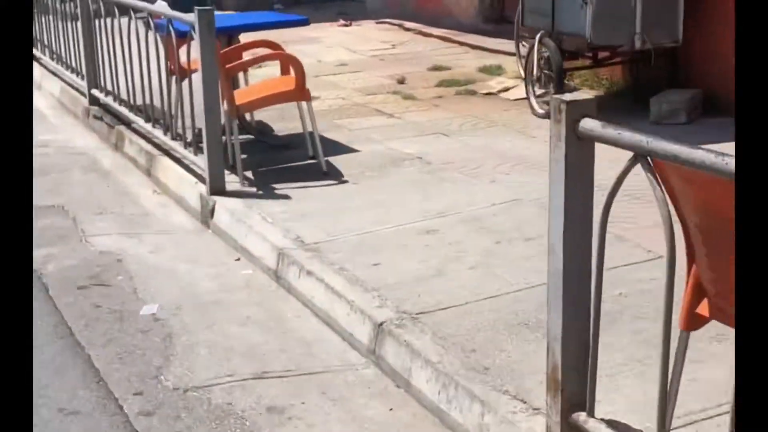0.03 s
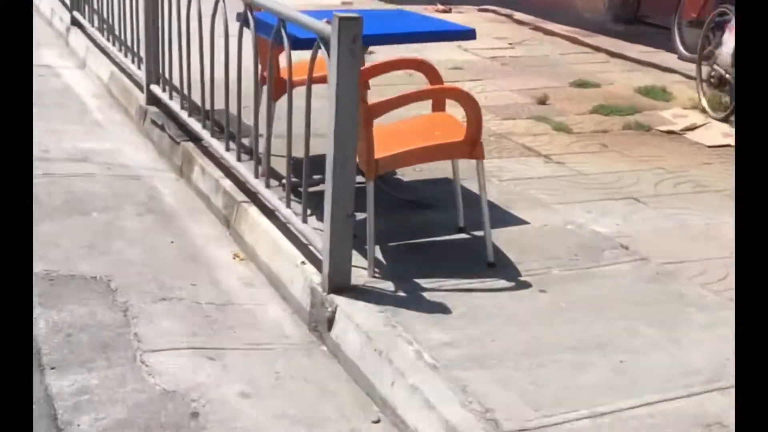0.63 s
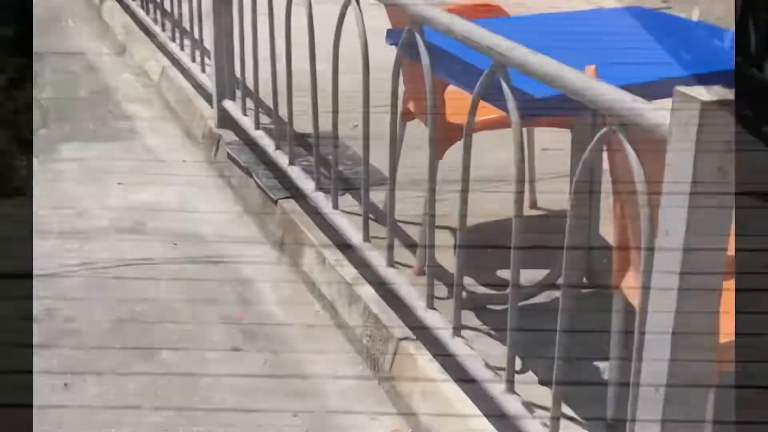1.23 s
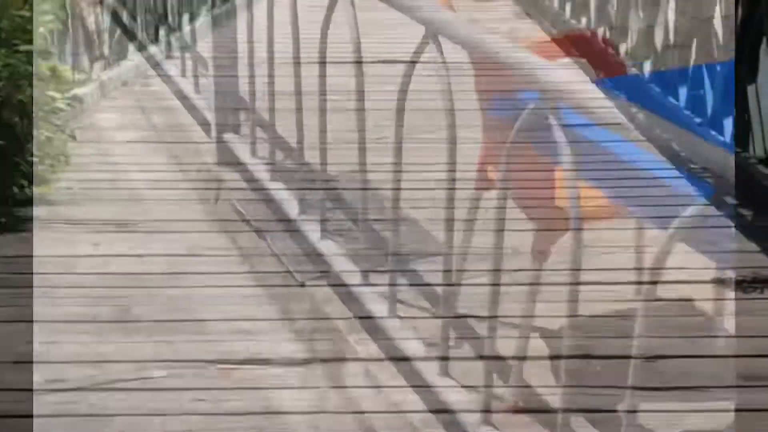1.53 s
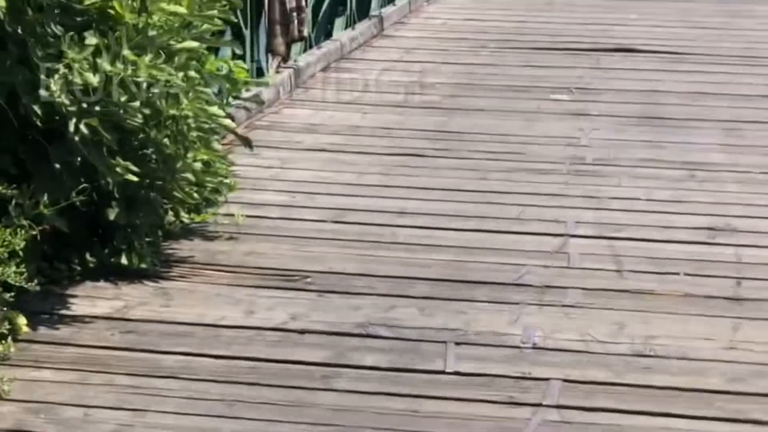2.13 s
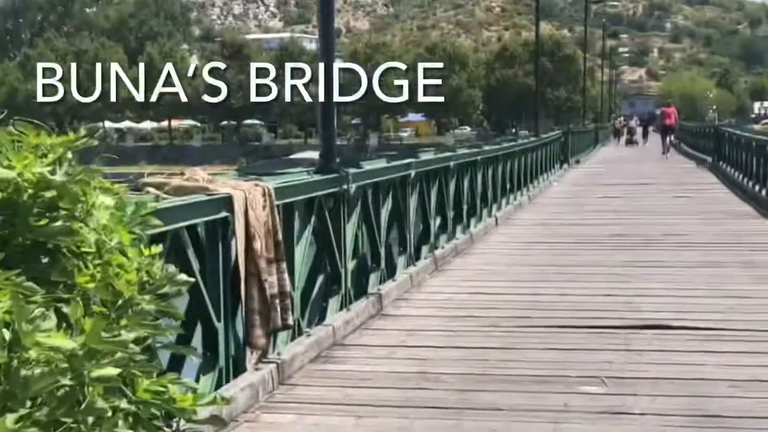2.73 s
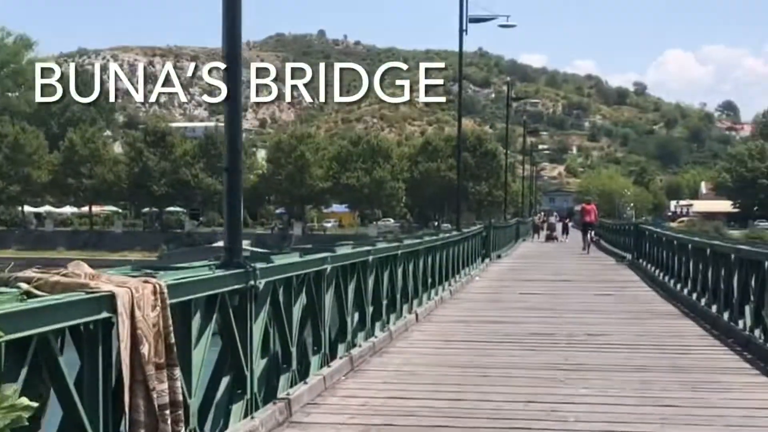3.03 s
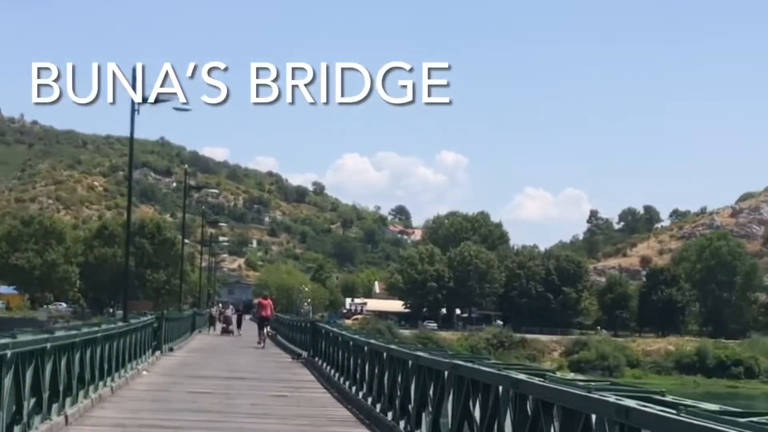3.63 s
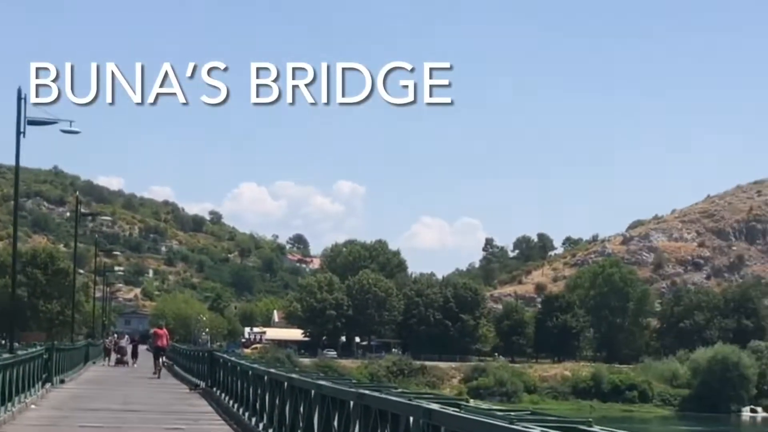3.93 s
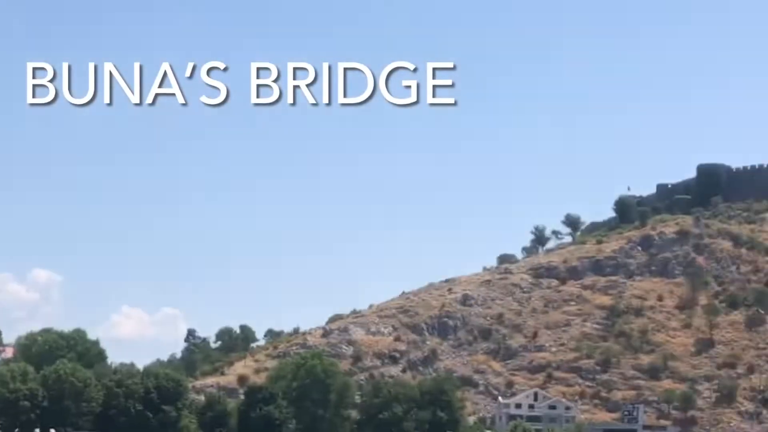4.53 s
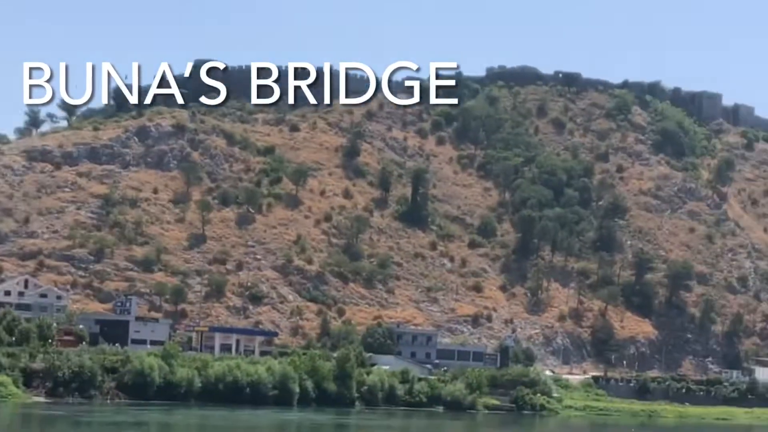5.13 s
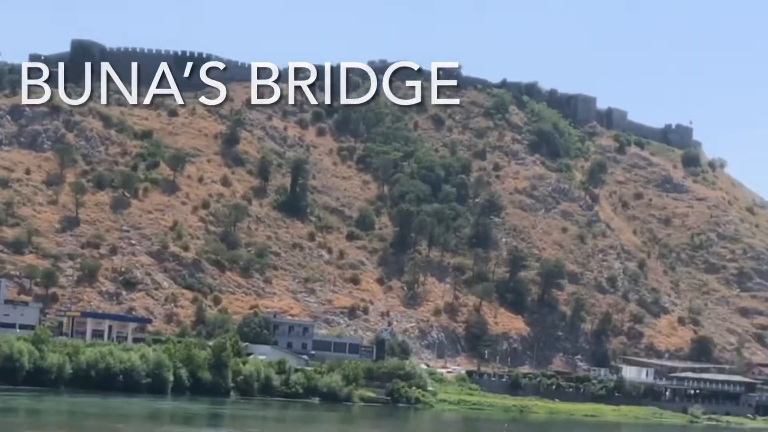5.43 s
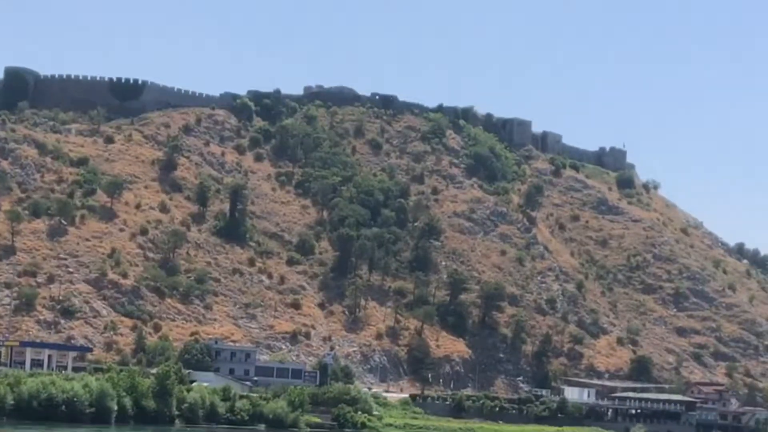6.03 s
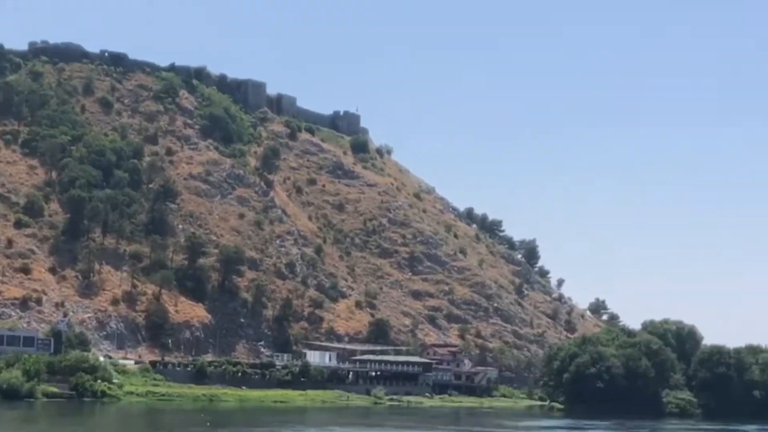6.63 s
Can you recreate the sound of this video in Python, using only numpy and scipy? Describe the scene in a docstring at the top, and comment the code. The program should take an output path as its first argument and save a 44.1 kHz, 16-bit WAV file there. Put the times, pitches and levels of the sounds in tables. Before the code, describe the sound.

A bicycle rolls along a street with a soft tyre roar, a distant idling engine and low puffs of wind on the microphone. This soon fades into a wooden bridge, heard from the saddle. The wheels rumble and loose planks knock irregularly, in clusters that grow louder. Jolts thud in the microphone, while the fittings rattle, tick and squeak faintly over a light hiss of tread and open air.

```python
"""Loose planks of a wooden bridge knock under a bicycle, front wheel then rear, heard from the saddle.
The wheels rumble over the deck, jolts thud in the microphone, and the bicycle's fittings rattle, tick and
squeak faintly over the hiss of tread and open air. The ride starts on a street with tyre roar, an idling
engine and puffs of wind, which fades out as the bridge fades in, between about 1 and 2 s."""
import sys
import numpy as np
from scipy import signal
from scipy.fft import rfft, irfft, next_fast_len
from scipy.io import wavfile
from scipy.ndimage import uniform_filter1d

SR = 44100
rng = np.random.default_rng(int(sys.argv[2]) if len(sys.argv) > 2 else 0)


def digitize_waveform(pressure):
    """Quantize a signal to 16-bit integers and store it at the path in sys.argv[1].

    Rows of a 2-D input are taken as channels; values are limited to [-1, 1].
    """
    field = np.atleast_2d(pressure).T
    bounded = np.clip(field, -1, 1)
    quanta = np.round(bounded * 32767).astype(np.int16)
    wavfile.write(sys.argv[1], SR, quanta)


N = 299439
T = np.arange(N) / SR
STREET_FADE_S = (1.145, 1.826)

# modes of a plank on its beams: f/Hz, level/dB, t60/s
PLANK_MODES = [(96, -1.5, 0.2), (126.7, 3, 0.11), (160, 0.5, 0.15), (198.5, -1, 0.21), (242, 0.5, 0.18),
               (291, -1.5, 0.079), (335, -2.5, 0.09), (390, -8, 0.18), (464, 2.5, 0.048), (525.4, 2, 0.13),
               (618, -4, 0.17), (687.5, -4, 0.19), (784, -0.5, 0.12), (950, 0.5, 0.043), (1025, -5.5, 0.11),
               (1152, -6.5, 0.12), (1320, -11.5, 0.08), (1620, -15.5, 0.1), (2060, -11.5, 0.1),
               (2630, -26, 0.036)]
# spectrum of the shuddering deck: f/Hz, level/dB
DECK_SPECTRUM = [(21, -19), (35, -1.5), (140, 2), (178, -6), (316, -1), (393, -3.5), (452, -1.5),
                 (772, -9.5), (852, -13), (1150, -15.5), (1770, -28), (2800, -35), (4000, -55), (5200, -76),
                 (8800, -120)]


def knocks(tight_slap_db=14, shudder_db=-11.5, bounce_gain=0.61, bounce_s=0.011, press_s=0.0043):
    """A plank slaps its beam, rings and bounces twice; the deck around it shudders on."""
    out, t = np.zeros(N), np.arange(SR // 3) / SR
    for s, db, thump_db, clap_db, ring in blows():
        # tight plank (small ring): more slap, less bounce, thinner blow
        board = crest(struck_part(PLANK_MODES, t, ring, size_spread=0.041, spot_db=4))
        board += undb(tight_slap_db * (1 - ring)) * crest(slap(t, ring))
        board *= 1 - decay(t, press_s * ring)  # soft tyre presses down
        hit = board.copy()
        lags = np.cumsum(bounce_s * SR * (0.5 + rng.random(2))).astype(int) + 1
        for k, lag in enumerate(lags, 1):
            hit[lag:] += (bounce_gain * ring) ** k * board[:-lag]
        shudder = shaped_noise(DECK_SPECTRUM, len(t)) * decay(t, 0.55 * ring) * (1 - decay(t, 0.018))
        hit = crest(hit) + undb(shudder_db) * ring * shudder
        # a heavy blow bends the whole board, a hard one claps
        thump = undb(thump_db - 1) * crest(band(hit, 72, 199))
        knock = crest(band(hit, 189, 636))
        clap = undb(clap_db) * crest(band(hit, 740, 2000))
        add(out, s, undb(db) * min(ring, 1) ** 0.78 * (knock - thump - clap))
    return out


def blows(wheelbase_m=1.08, cruise_m_s=2.781, gentle_db=-36, thump_per_db=-0.27, thump_db_per_m_s=-42):
    """Both wheels strike each plank. Rows: t/s, level/dB, thump/dB, clap/dB, t60 factor."""
    # front wheel on loose planks: t/s, level/dB, clap/dB, t60 factor, rear wheel re front/dB
    loose_planks = [(1.524, -33.5, -5, .3, -19), (1.886, -49.5, -8, 1, -24), (1.96, -48, -8, .7, -6),
                    (2.082, -41, -8.5, .6, -11), (2.175, -56, 5, .5, -15), (2.31, -55.5, -7, .7, 11),
                    (2.337, -37, -27, 1.2, -11.5), (2.405, -44.5, -11, 1, -23), (2.447, -45.5, -4, .7, -18),
                    (2.507, -41.5, -6.5, .7, -15), (2.601, -42, -12.5, 1, 4.5), (2.664, -46, -18, .6, -17),
                    (2.921, -44, -9.5, 1, -7), (3.188, -43.5, 0, 1, -8), (3.257, -37, -9, .55, -17),
                    (3.366, -44.5, 3, .55, 3.5), (3.473, -36, -14, 1, -38), (3.489, -37.5, -1, .8, -7.5),
                    (3.512, -35, -11, .9, -32), (3.533, -30, -2.5, .6, -39), (3.565, -37.5, -15, .7, -24),
                    (3.595, -37.5, -4.5, .6, -27), (3.822, -40.5, -3, .7, -33),
                    (3.987, -28.5, -4.5, .5, 1.5), (4.001, -36, -16, .8, 4.5), (4.016, -26, -1.5, .7, -2),
                    (4.029, -24.5, -10.5, .85, 0.5), (4.054, -35.5, -6, .8, -8),
                    (4.223, -28.5, -5.5, .3, -5), (4.26, -41.5, 3.5, .7, -22), (4.587, -42.5, 7, .3, -27),
                    (4.756, -45.5, 2.5, 1, -24), (4.826, -33.5, -15.5, .9, 0.5), (4.858, -52, -3, 1.2, 2),
                    (5.395, -40.5, 1, .45, -27), (5.479, -38.5, -23, 1, -12), (5.58, -34, -12, .8, 1),
                    (5.731, -35.5, -40, .8, 2), (5.851, -30, -6.5, .9, -6.5), (6.003, -28, -17, .9, 0),
                    (6.051, -33, -17, 1.1, -13), (6.108, -27, -11, .8, 0), (6.133, -25, -7.5, .6, 0.5),
                    (6.184, -28, -14.5, .6, -.5), (6.207, -34, -17, .8, 6), (6.31, -42, -6, 1, 4)]
    # bicycle speed: t/s, v/(m/s)
    speeds = [(0, 2.7), (3.4, 2.745), (3.95, 2.825), (4.25, 2.785), (4.85, 2.84), (5.65, 3.055)]
    rows = []
    for s, db, clap_db, ring, rear_db in loose_planks:
        speed_m_s = np.interp(s, *np.transpose(speeds))
        # gentle blows mostly bend the board; harder or faster ones have a smaller share of thump
        thump_db = thump_per_db * (db - gentle_db) + thump_db_per_m_s * (speed_m_s - cruise_m_s)
        rows.append((s, db, thump_db, clap_db, ring))
        # the rear wheel carries the rider: more bend, harder clap
        rear_thump_db = thump_db + thump_per_db * rear_db + 0.5
        rows.append((s + wheelbase_m / speed_m_s, db + rear_db, rear_thump_db, clap_db + 2.5, ring))
    return rows


def slap(t, ring, dispersion_s=0.004521):
    """Bending wave along a board: speed grows with the root of frequency, so lows arrive last."""
    khz = (np.arange(len(t) // 2 + 1) * SR / len(t) + 1) / 1000
    delay_s = dispersion_s * np.maximum(1 / np.sqrt(khz) - 0.5, 0)
    phase_cycles = np.cumsum(delay_s) * SR / len(t) + rng.random()
    wave = irfft(np.exp(-2j * np.pi * phase_cycles), len(t))
    grit = noise(len(t)) * decay(t, 0.064 * ring)
    return colour(wave + ring * grit / np.linalg.norm(grit), DECK_SPECTRUM) * decay(t, 0.98)


def rolling(planks=6, taps_per_s=45, scatter_db=4, chatter_db=-10):
    """Tyres drop into gap after gap: small taps ring several planks and keep the deck rumbling."""
    # wheel rumble: t/s, level/dB
    rumble_levels = [(1.8, -59), (1.96, -52), (2.04, -55), (2.23, -51.5), (2.31, -54), (2.4, -47.5),
                     (2.56, -50.5), (2.7, -45.5), (2.87, -59), (3.13, -47), (3.45, -47), (3.66, -43),
                     (3.85, -49.5), (4.25, -45.5), (4.7, -52.5), (5.15, -54.5), (5.37, -46.5), (5.8, -53),
                     (6.05, -48.5), (6.6, -41.5), (6.79, -44)]
    level_db, = curves(rumble_levels)
    t, boards = np.arange(SR // 5) / SR, 0
    for _ in range(planks):
        taps = impulses(taps_per_s, scatter_db)
        boards += signal.oaconvolve(taps, struck_part(PLANK_MODES, t, ring=0.76, size_spread=0.043))[:N]
    deck = unit(boards) + 0.98 * shaped_noise(DECK_SPECTRUM)
    rumble = unit(band(deck, 48.3, 400, order=3)) * undb(level_db + 0.5)
    chatter = unit(band(deck, 414, 1520, order=3)) * undb(level_db + chatter_db)
    return (rumble + chatter) * np.interp(T, [1.4, 1.9], [0, 1])


def thuds(swell_s=0.012):
    """Short low thuds as the ride jolts the microphone."""
    # microphone jolts: t/s, level/dB, f/Hz
    jolts = [(3.458, -42, 52.4), (3.6, -47, 58.4), (3.74, -41.5, 56.6), (4.465, -42, 46), (4.98, -53, 50),
             (5.212, -43.5, 48), (5.335, -48, 52), (5.525, -58, 50), (5.737, -44, 38.2), (6.275, -41.5, 52)]
    out, t = np.zeros(N), np.arange(SR // 4) / SR
    envelope = t / swell_s * np.exp(1 - t / swell_s)
    for s, db, hz in jolts:
        add(out, s, undb(db) * envelope * np.sin(2 * np.pi * hz * t))
    return band(out, 33, 200)


def rattle(gain_db=-18, parts=4, clacks_per_s=120, clack_t60_s=0.023, jolt_t60_s=0.2):
    """Each knock shakes loose bicycle parts into dry clacks; hard claps shake them most."""
    jolts, t, clacks = np.zeros(N), np.arange(SR // 3) / SR, 0
    for s, db, _, clap_db, _ in blows():
        add(jolts, s, undb(db + clap_db / 2) * decay(t, jolt_t60_s) * (1 - decay(t, 0.013)))
    for _ in range(parts):
        contacts = impulses(clacks_per_s, scatter_db=3.5) * np.sign(noise())
        clacks += signal.oaconvolve(contacts, noise(len(t)) * decay(t, clack_t60_s))[:N]
    buzz = colour(clacks, [(500, 7), (790, 14.5), (1150, 7.5), (1500, -3), (2050, -8.5), (2800, -11),
                           (3400, -18), (4200, -23), (7000, -36), (15000, -59)])
    return unit(buzz) * jolts * undb(gain_db)


def ticks(tail_db=-15, rise_s=0.0013):
    """Short clicks, most from jolted fittings: small parts are bright, heavy ones dull and ringing."""
    # clicks: t/s, level/dB, tilt/(dB/octave), t60 factor
    # at 1.749 s: a thin, sharp, high click as the street fades into the bridge
    clicks = [(.086, -57.5, 18, .6), (.157, -57, 30, .6), (1.527, -46, -1, .22), (1.749, -60.5, 16, .3),
              (1.824, -47.5, -4, 1.2), (1.85, -57, -3, 1), (1.889, -52.5, -2.5, 1.3),
              (2.244, -50.5, -1.5, 1.5), (3.059, -54, -3, .6), (3.108, -54.5, -2, .4), (3.153, -62, 5, .6),
              (3.198, -52, -2.5, 1), (3.369, -57, -4, .6), (3.464, -51.5, -1.5, 1.8),
              (3.479, -51, -1.5, 1.5), (3.529, -50, -3.5, .8), (3.567, -53, -3, .8), (3.596, -58, -4, .7),
              (3.744, -51, -2, 1), (3.76, -49.5, -3.5, .8), (3.811, -54, -2, 1), (3.878, -54, -3.5, .9),
              (4.023, -41, -3, 1), (4.028, -56, 6, .9), (4.053, -57, 3, 1), (4.144, -46.5, -2, .7),
              (4.587, -61, -3, .6), (4.698, -49, -3.5, .7), (4.882, -51, -2.5, .7), (5.072, -51.5, -3, .8),
              (5.338, -56, -3, .6), (5.407, -51.5, -0.5, .7), (5.469, -47.5, 0, 1), (5.718, -53.5, -7, 1.5),
              (5.778, -51, -3.5, 1), (5.851, -47.5, -3.5, 1), (5.868, -51, -6, 1.1), (6.051, -47.5, -2, .7),
              (6.061, -51, 3, .4), (6.116, -55, 1, .4), (6.132, -36.5, -4, .9), (6.173, -59, 5, .4),
              (6.204, -55, -7, 1.2), (6.343, -50.5, 0, .7), (6.468, -50, -9, 1.2), (6.489, -44, -4, 1)]
    # click spectrum: f/Hz, level/dB
    click_spectrum = [(900, -25), (1600, 3), (2200, -1), (2750, -6.5), (3300, -2), (5000, -7),
                      (8000, -15.5), (15000, -38)]
    # modes of the metal fittings: f/Hz, level/dB, t60/s
    metal_modes = [(1604, -0.5, 0.084), (2610, 4.5, 0.055), (2846, -3, 0.089), (4120, -22, 0.059),
                   (5470, -30, 0.1)]
    out, t = np.zeros(N), np.arange(SR // 6) / SR
    for s, db, tilt, ring in clicks + stray_ticks():
        envelope = decay(t, 0.084 * ring) + undb(tail_db) * decay(t, 0.24 * ring)
        envelope *= 1 - decay(t, rise_s)
        tilted = [(hz, level_db + tilt * np.log2(hz)) for hz, level_db in click_spectrum]
        click = crest(colour(noise(len(t)), tilted) * envelope)
        clink = crest(struck_part(metal_modes, t, 0.52 * ring, size_spread=0.024, spot_db=1.5))
        clink_db = -7 - 3 * tilt
        add(out, s, undb(db) * crest(click + undb(clink_db) * clink) / 2)
    return out


def stray_ticks(rate_per_s=3, level_db=-61, spread_db=2, tilt_db_per_octave=2):
    """Faint random ticks on the bridge. Rows: t/s, level/dB, tilt/(dB/octave), t60 factor."""
    times = T[(rng.random(N) < rate_per_s / SR) & (T > STREET_FADE_S[1])]
    draws = noise((len(times), 2))
    return [(s, level_db + spread_db * a, tilt_db_per_octave * b, 0.5) for s, (a, b) in zip(times, draws)]


def squeaks(settle_s=0.0063, jitter=0.02, rasp_db=4.5, attack_share=0.3, release_share=0.32):
    """Short whistles of the fittings settle onto their pitch; rough ones stutter."""
    # squeaks: t/s, f/Hz, level/dB, length/s, roughness, initial pitch excess as a share of f
    whistles = [(3.471, 5440, -61.5, 0.037, .55, 0.14), (3.474, 5000, -73, 0.038, .9, 0.04),
                (3.494, 5310, -70, 0.047, .6, 0.069), (4.302, 7980, -76, .021, .1, 0),
                (4.478, 7950, -77, .022, .1, 0), (5.196, 7160, -70, 0.041, 0.7, 0),
                (5.488, 7019, -79, .026, .1, 0), (5.642, 7041, -71, 0.024, .2, 0.02),
                (6, 5700, -80, .065, 1.6, 0.03), (6.068, 5800, -71, .029, .3, 0.014),
                (6.07, 6460, -72, .027, .3, 0), (6.07, 5390, -76, .028, .4, 0),
                (6.106, 7860, -77, .025, .9, .02), (6.118, 5380, -74, 0.098, .4, 0),
                (6.138, 7330, -81, 0.044, .8, 0), (6.276, 7881, -80, 0.031, .5, 0),
                (6.406, 7250, -77, .019, .7, 0), (6.44, 8050, -75, .023, .3, 0),
                (6.569, 7800, -72, .03, .6, 0.04), (6.714, 8150, -79, .025, .15, 0)]
    out, waver, stutter = np.zeros(N), walk(1000), walk(350)
    for s, hz, db, length_s, rough, sharp in whistles:
        t = np.arange(int(length_s * SR)) / SR
        span = slice(int(s * SR), int(s * SR) + len(t))
        pitch_hz = hz * (1 + sharp * np.exp(-t / settle_s) + rough * jitter * waver[span])
        tone = np.sqrt(2) * np.sin(2 * np.pi * np.cumsum(pitch_hz) / SR)
        swell = np.clip(np.minimum(t / attack_share, (length_s - t) / release_share) / length_s, 0, 1)
        add(out, s, swell * undb(db + rough * rasp_db * stutter[span]) * tone)
    return out


def street(roar_db=-51.5, roar_db_per_s=3.5, hiss_db=-67.5, hiss_db_per_s=4, flicker_db=0.2):
    """Tyres on smooth pavement and traffic: roar and hiss swell, then fade out."""
    # street spectrum: f/Hz, level/dB
    spectrum = [(120, -9), (190, -11.5), (255, -3.5), (350, -15.5), (490, -14), (580, -22.5), (950, -15),
                (1280, -23.5), (1650, -22), (2350, -28), (3600, -32), (6000, -40.5), (10000, -50.5),
                (15000, -55)]
    roar = unit(band(shaped_noise(spectrum), 126, 1740, order=3))
    roar *= undb(roar_db + roar_db_per_s * T - flicker_db * walk(15))
    hiss = unit(band(shaped_noise(spectrum), 2220, SR / 2, order=3))
    hiss *= undb(hiss_db + hiss_db_per_s * T)
    return (roar + hiss) * np.interp(T, STREET_FADE_S, [1, 0])


def engine(firing_hz=79.9, gain_db=-1.5, uneven_db=0.8, wander_rad=0.06):
    """Distant idling engine: only the lowest firing harmonics carry, each wavering a little."""
    # hum: t/s, levels of harmonics 1, 2, 3/dB
    harmonics = [(0, -83, -59.5, -53), (.25, -68, -62, -64), (.55, -52.5, -49.5, -54.5),
                 (.85, -62, -57, -60), (.97, -49, -50.5, -66), (1.15, -51.5, -49, -66),
                 (1.3, -54, -63, -52.5), (1.62, -53, -77, -62), (1.85, -57.5, -89, -68)]
    phase = 2 * np.pi * firing_hz * T + wander_rad * walk(20)
    hum = sum(undb(db + uneven_db * walk(22)) * np.sin(k * phase)
              for k, db in enumerate(curves(harmonics), 1))
    return np.sqrt(2) * undb(gain_db) * hum * np.interp(T, [1.8, 1.95], [1, 0])


def wind(breeze_db=-61.5, half_puff_s=0.045):
    """Low puffs on the microphone along the street."""
    # wind puffs: t/s, level/dB
    puffs = [(.01, -45.5), (.2, -45), (.49, -47.5), (.63, -53)]
    buffet = shaped_noise([(15, -47), (30, -29), (48, -1.5), (66, -4.5), (110, -14), (200, -47),
                           (1500, -90)])
    force = undb(breeze_db) + sum(undb(db) * np.exp(-((T - s) / half_puff_s) ** 2) for s, db in puffs)
    return buffet * force * np.interp(T, [1.4, 1.9], [1, 0])


def air_and_tread(air_db=-70):
    """Steady open air over the river and faint hiss of the tread on dry wood."""
    # open-air spectrum: f/Hz, level/dB
    air_spectrum = [(700, -1), (1300, -3), (1620, 2), (1900, -11), (2700, -17.5), (3300, -19.5),
                    (5200, -18.5), (8000, -22.5), (10000, -23.5), (14600, -25.5), (15500, -36)]
    # tread hiss: t/s, level/dB
    tread_levels = [(1.8, -78), (2.9, -75.5), (3.9, -75), (5.17, -74.5), (5.24, -69.5), (5.75, -74),
                    (6.31, -72.5), (6.37, -67.5), (6.52, -70), (6.79, -70.5)]
    air = shaped_noise(air_spectrum) * undb(air_db)
    tread = shaped_noise([(800, -18), (2000, 3), (4500, -4.5), (7000, -10), (10000, -14.5), (15000, -20)])
    tread *= undb(curves(tread_levels)[0])
    return (air + tread) * np.interp(T, [1.2, 1.8], [0, 1])


def struck_part(modes, t, ring, size_spread, spot_db=3):
    """Damped modes: the part's size shifts them, the struck spot weights them, ring scales t60."""
    hz, db, t60_s = np.transpose(modes)[:, :, None]
    hz = hz * np.exp(size_spread * noise(1) + size_spread / 2 * noise(hz.shape))
    weight = undb(db + spot_db * noise(hz.shape)) * np.sign(noise(hz.shape))
    return np.sum(weight * np.sin(2 * np.pi * hz * t) * decay(t, t60_s * ring), axis=0)


def undb(db):
    """Decibels to gain."""
    return 10 ** (np.asarray(db) / 20)


def unit(x):
    """Scale to rms 1."""
    return x / np.sqrt(np.mean(x ** 2))


def crest(x):
    """Scale a blow to swing to about 1 at its loudest."""
    return x / (2 * np.sqrt(uniform_filter1d(x ** 2, size=700).max()))


def curves(table):
    """Columns of (t/s, ...) rows, interpolated per sample."""
    s, *columns = np.transpose(table)
    return [np.interp(T, s, c) for c in columns]


def band(x, lo_hz, hi_hz, order=2):
    """Causal band-pass."""
    sos = signal.butter(order, [lo_hz, min(hi_hz, SR / 2 - 1)], "bandpass", fs=SR, output="sos")
    return signal.sosfilt(sos, x)


def colour(x, spectrum):
    """Filter by (f/Hz, level/dB) points."""
    hz, db = np.transpose(spectrum)
    size = next_fast_len(len(x))
    bin_hz = np.maximum(np.arange(size // 2 + 1) * SR / size, 1)
    gain = undb(np.interp(np.log(bin_hz), np.log(hz), db))
    return irfft(rfft(x, size) * gain, size)[:len(x)]


def noise(size=N):
    """White noise."""
    return rng.standard_normal(size)


def shaped_noise(spectrum, size=N):
    """Noise of rms 1 shaped by (f/Hz, level/dB) points."""
    return unit(colour(noise(size), spectrum))


def impulses(rate_per_s, scatter_db):
    """Randomly timed impulses of scattered level."""
    return (rng.random(N) < rate_per_s / SR) * undb(scatter_db * noise())


def walk(rate_hz):
    """Slewed random steps, rms 1."""
    hold = int(SR / rate_hz)
    steps = np.repeat(noise(N // hold + 1), hold)[:N]
    return unit(uniform_filter1d(steps, hold))


def decay(t, t60_s):
    """Fall by 60 dB in t60_s."""
    return np.exp(-np.log(1000) * t / t60_s)


def add(out, s, sound):
    """Mix a sound in at time s."""
    i = max(int(s * SR), 0)
    out[i:i + len(sound)] += sound[:N - i]


def scene():
    """The street gives way to the bridge; mono."""
    town = street() + engine() + wind()
    bridge = rolling() + knocks() + thuds() + rattle() + ticks() + squeaks() + air_and_tread()
    return (town + bridge)[None]


def record(dry):
    """Steep low-pass at 15.6 kHz."""
    return signal.sosfilt(signal.ellip(10, 0.2, 70, 15600, fs=SR, output="sos"), dry)


dry = scene()
out = record(dry)
digitize_waveform(out)
```